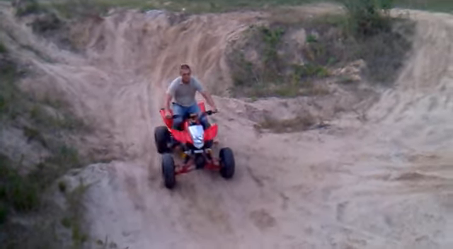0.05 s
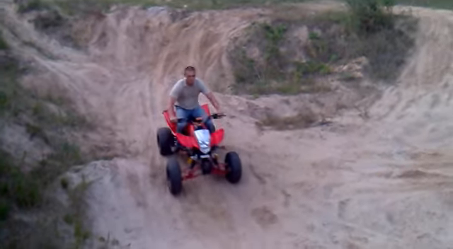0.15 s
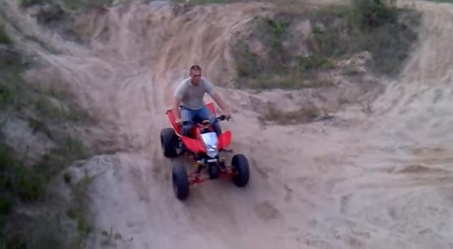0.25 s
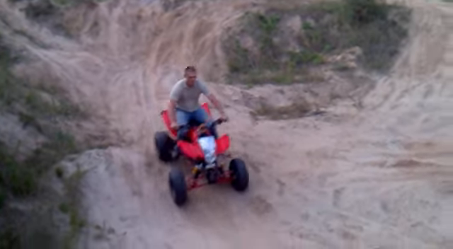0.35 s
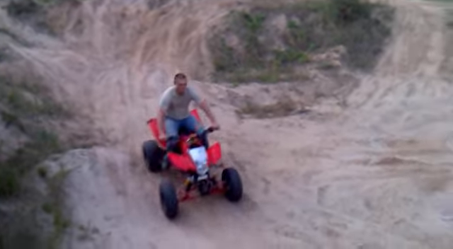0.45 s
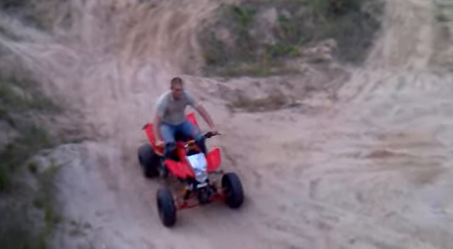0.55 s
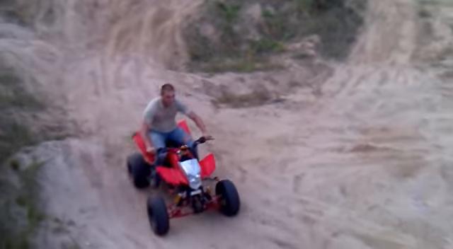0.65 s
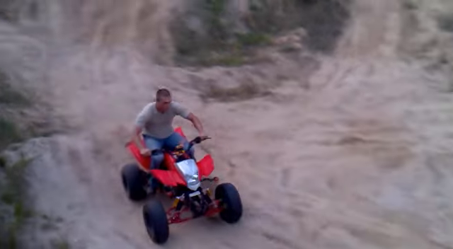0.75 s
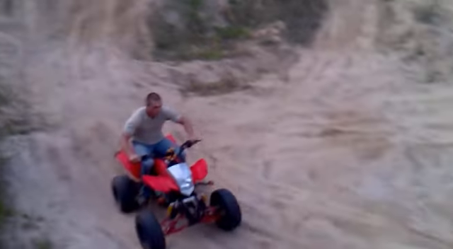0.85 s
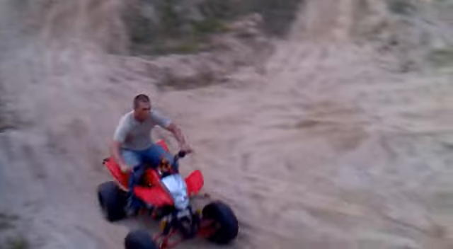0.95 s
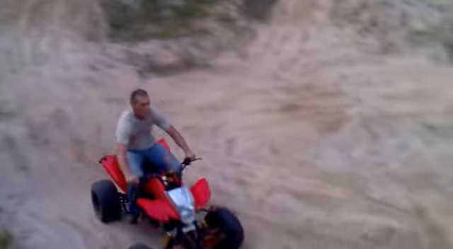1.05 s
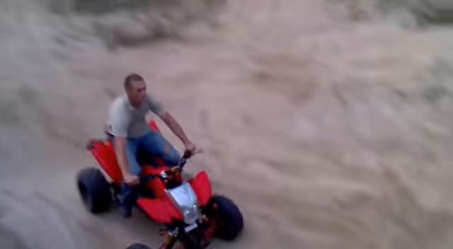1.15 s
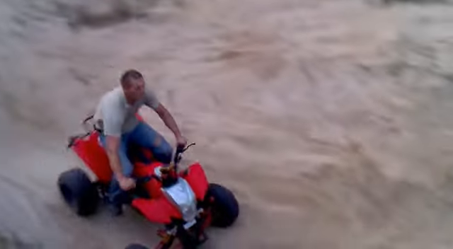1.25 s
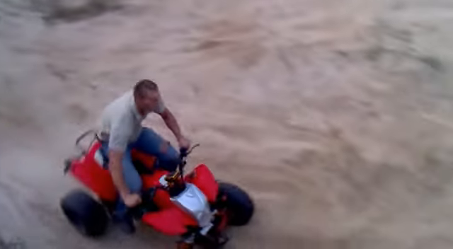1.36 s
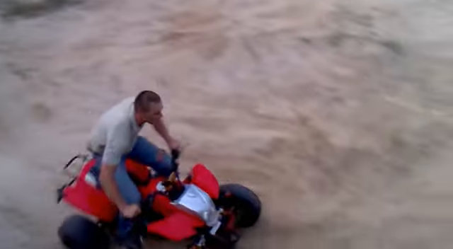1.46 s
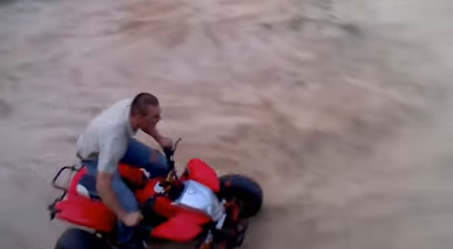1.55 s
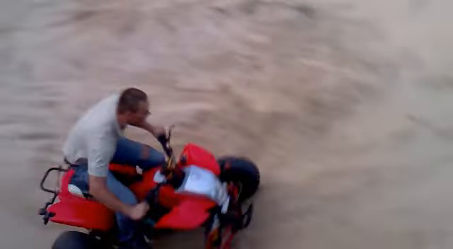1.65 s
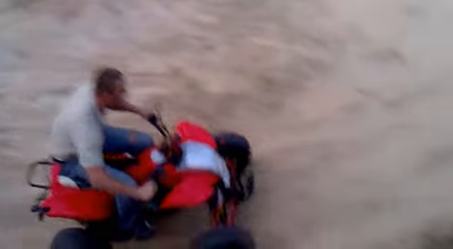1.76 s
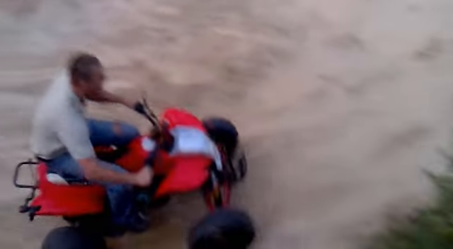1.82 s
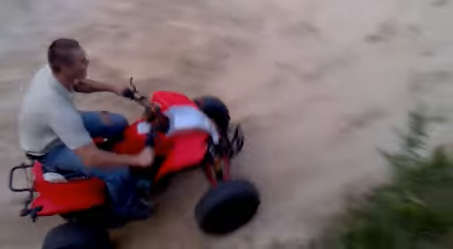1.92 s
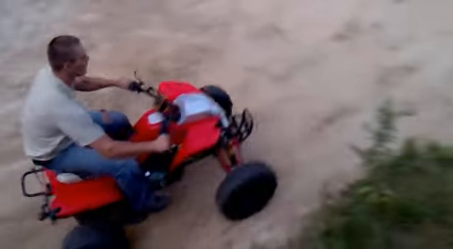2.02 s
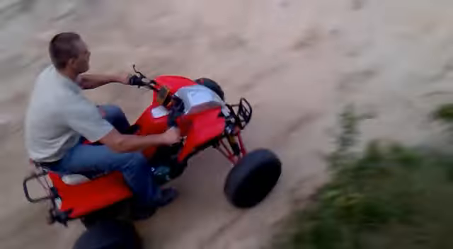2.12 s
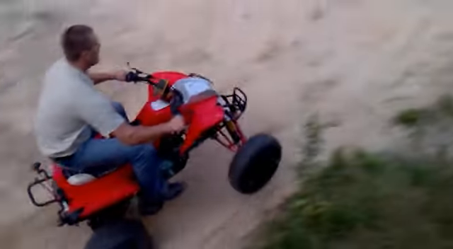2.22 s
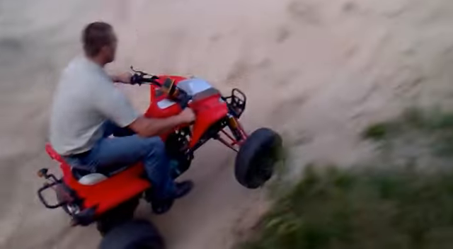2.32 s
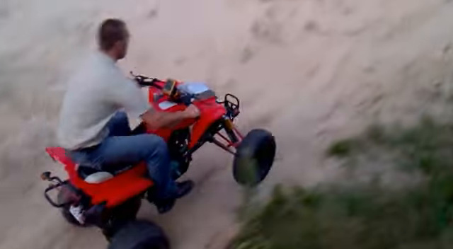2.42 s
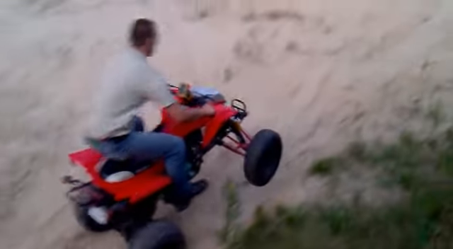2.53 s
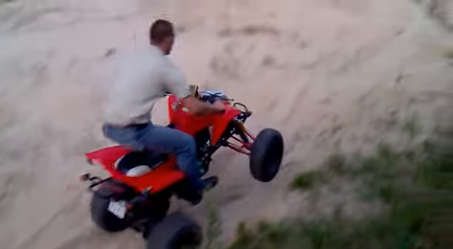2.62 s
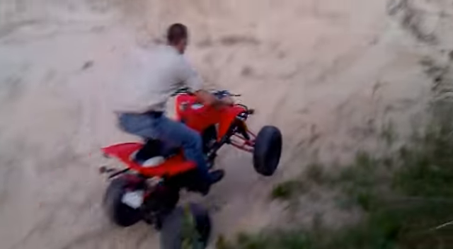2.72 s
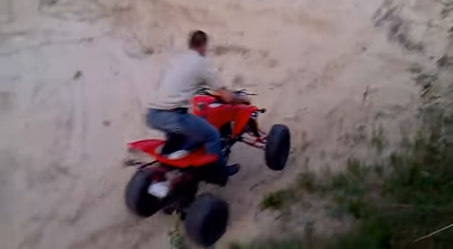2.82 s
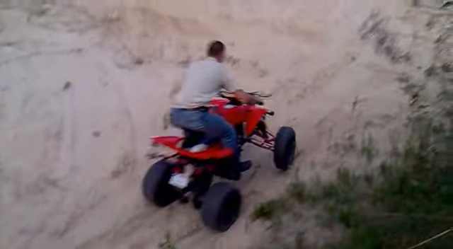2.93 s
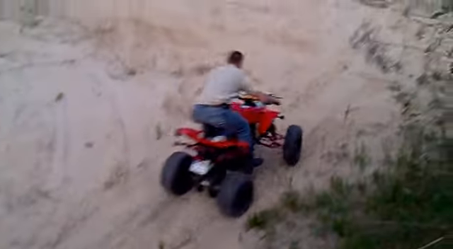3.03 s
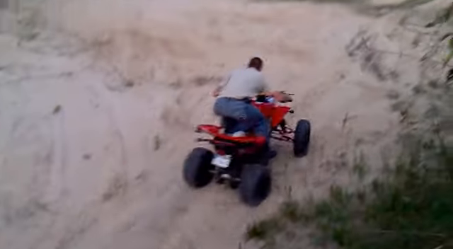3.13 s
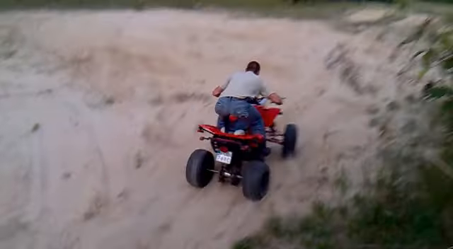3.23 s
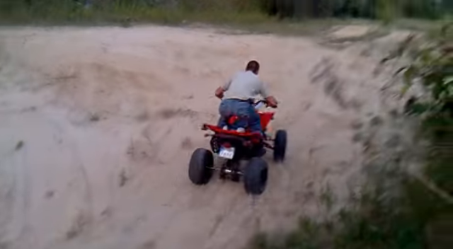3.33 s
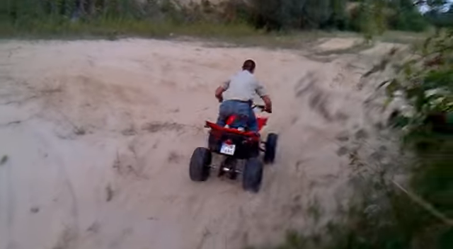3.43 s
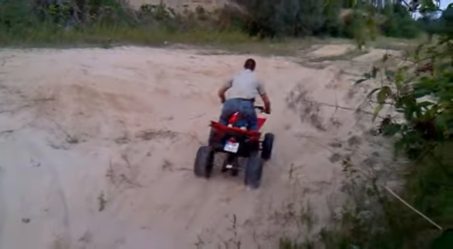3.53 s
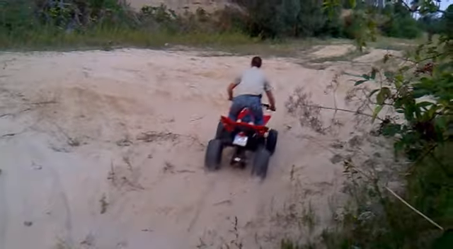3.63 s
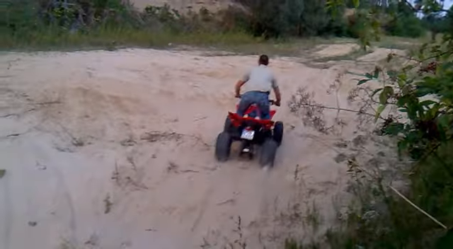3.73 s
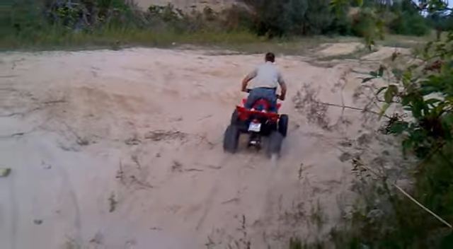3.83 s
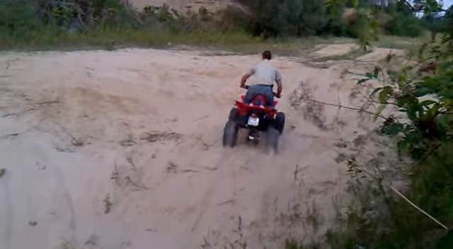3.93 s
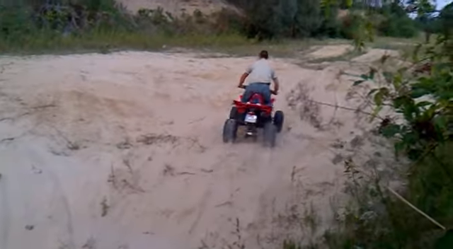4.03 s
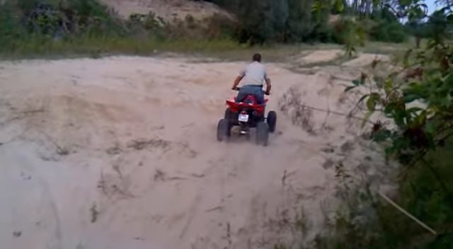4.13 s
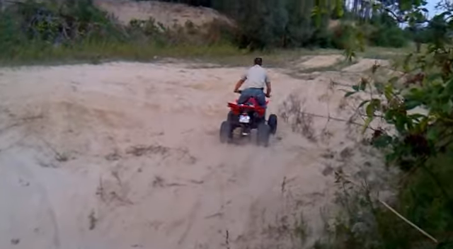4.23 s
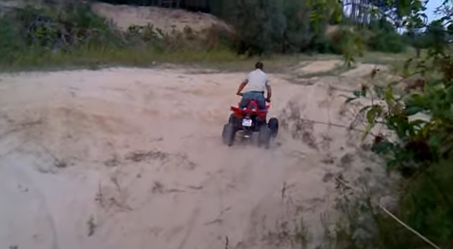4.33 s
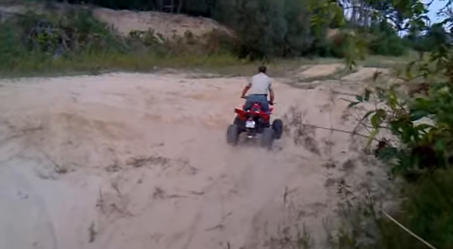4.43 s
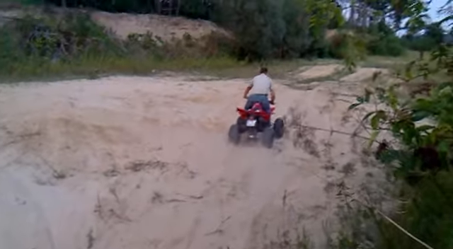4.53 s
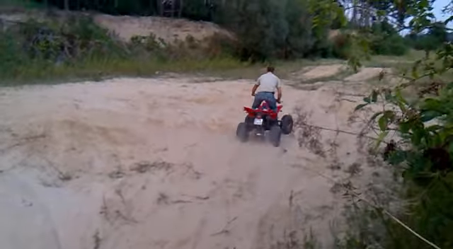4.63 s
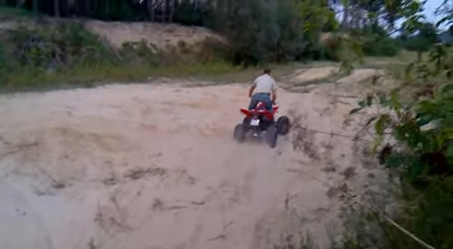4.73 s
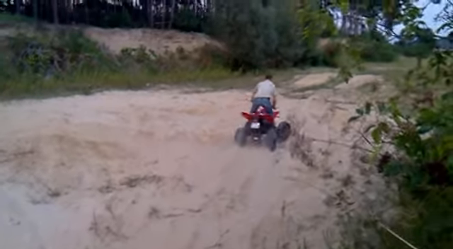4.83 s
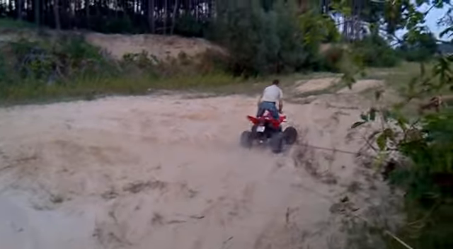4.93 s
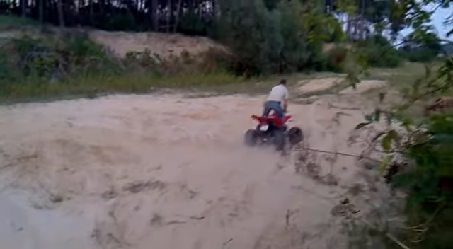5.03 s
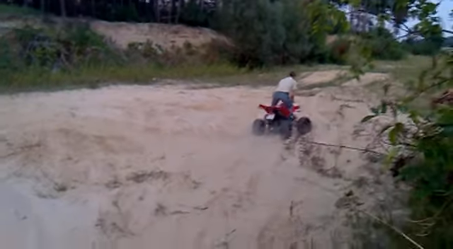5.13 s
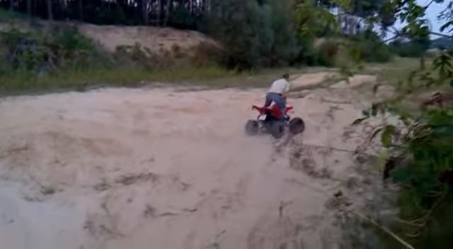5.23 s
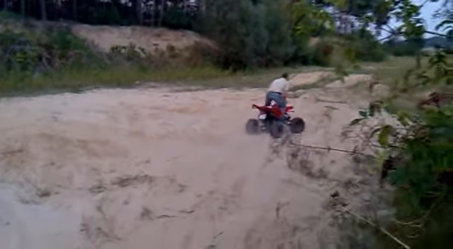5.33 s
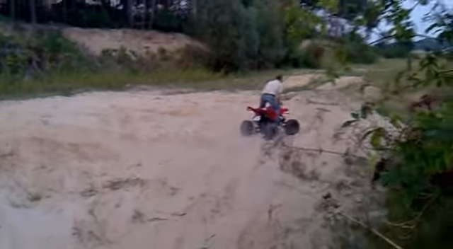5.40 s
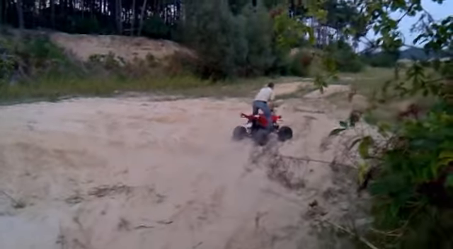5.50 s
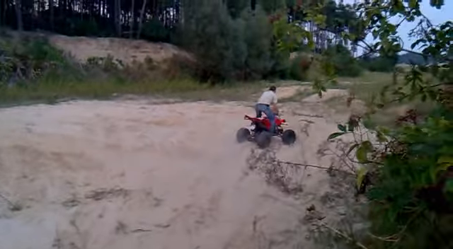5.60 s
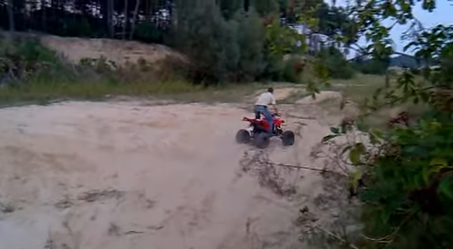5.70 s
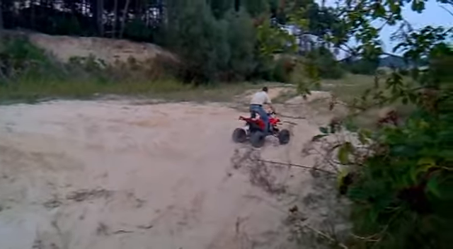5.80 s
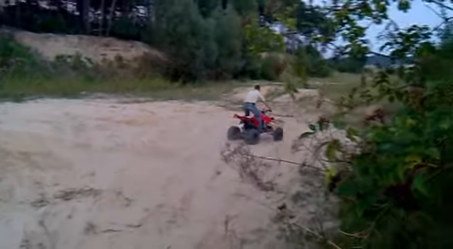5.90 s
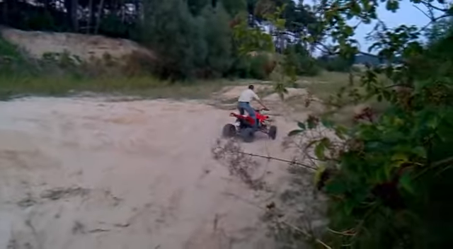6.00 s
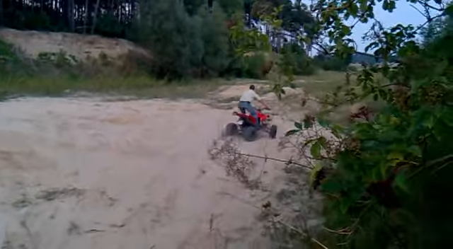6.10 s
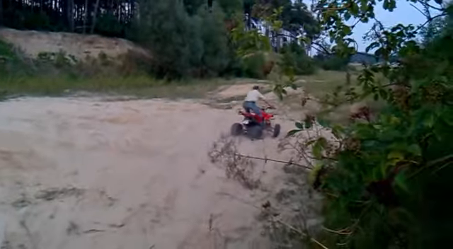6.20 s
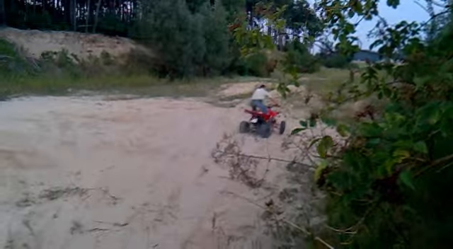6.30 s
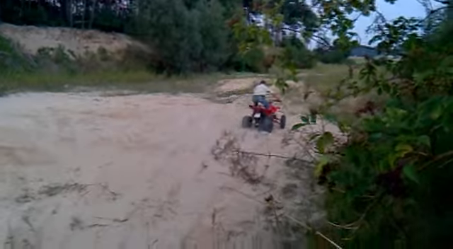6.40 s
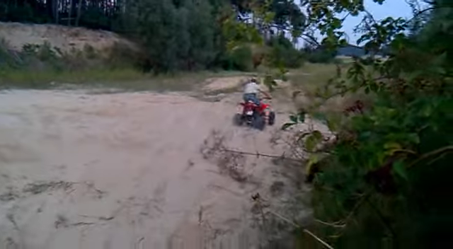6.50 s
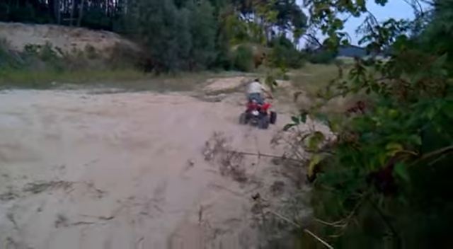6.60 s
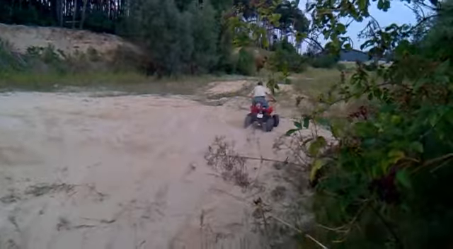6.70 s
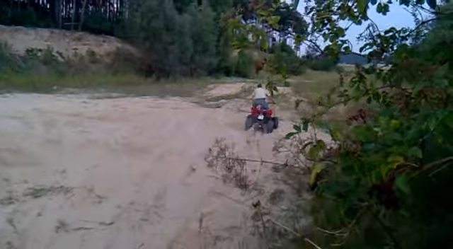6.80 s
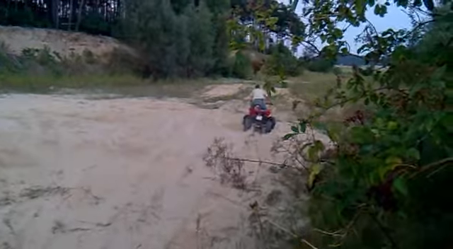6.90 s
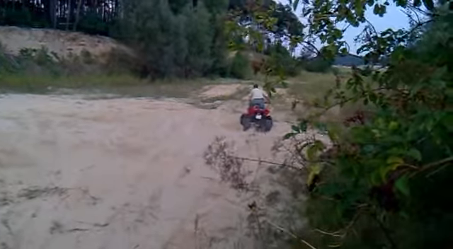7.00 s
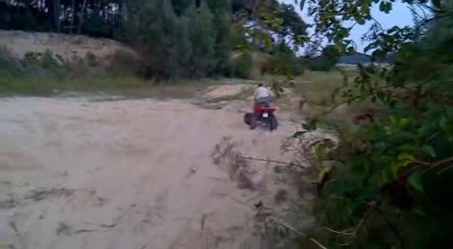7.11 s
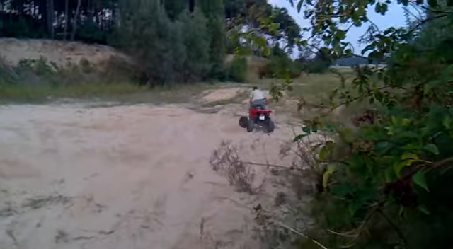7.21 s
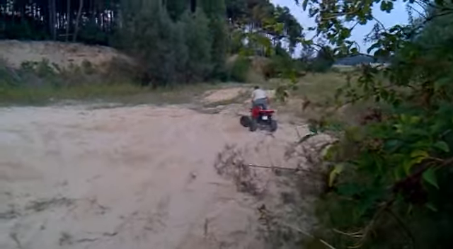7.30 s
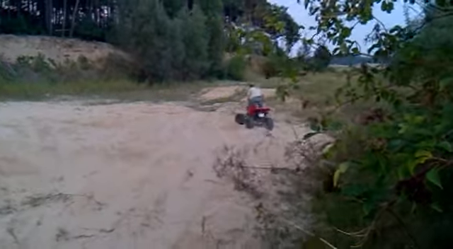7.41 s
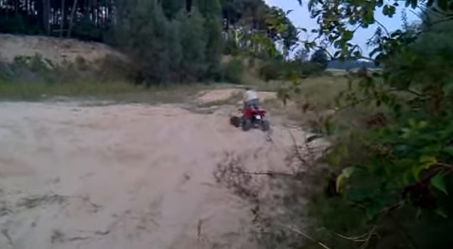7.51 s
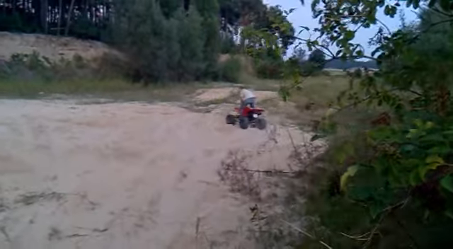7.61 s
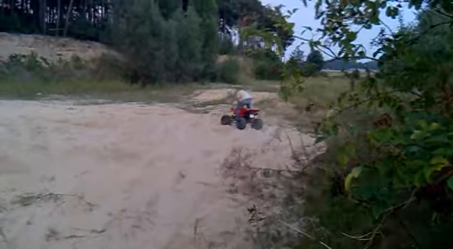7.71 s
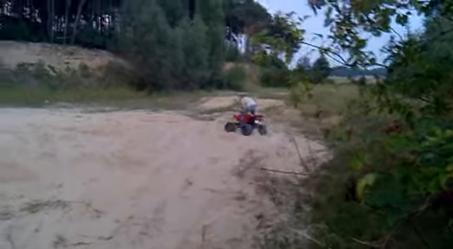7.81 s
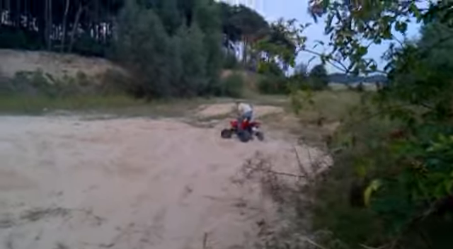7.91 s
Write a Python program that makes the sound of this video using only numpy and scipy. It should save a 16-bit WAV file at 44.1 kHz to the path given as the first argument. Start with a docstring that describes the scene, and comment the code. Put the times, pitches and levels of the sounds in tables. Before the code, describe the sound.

A mono, hand-held outdoor take in a sandy pit. From 0 s a single-cylinder quad bike approaches with a fast, muffled putter, about 32 firings a second, rising to 44 near 0.9 s, sagging around 1.3 s and picking up again. Casing rattle, dull sand churn and thin wavering gear whine ride along, with small chain slaps near 1.15 and 1.6 s. At 2 s it passes: the exhaust turns abruptly loud, raspy and bright, with gas hiss and rattle. Revs climb to about 57 a second around 3 s, with hard metallic cracks and slight overload. At 3.4 s the throttle shuts; pitch drops quickly to a hollow, uneven burble with soft pops around 3.9-4.2 s. A gentle throttle returns near 4.9 s, then the engine steadies and fades into the distance to 8 s. Low wind thuds buffet the microphone from 4.3 s, heaviest around 7.3 s, with faint leaf rustle.

```python
"""A single-cylinder quad bike rolls toward a hand-held microphone on sand, passes at open throttle, lifts off
and drives away. Each firing blows a thump and bark from harmonics, a crack of decaying pipe modes and a noise jet.
Shaped noise makes the rattle, churning tyres and chain slaps; unsteady sine tones make the gear whine.
Low noise gusts buffet the microphone, leaves stir nearby, and the input stage overloads softly."""
import sys
import numpy as np
from scipy.fft import rfft, irfft, next_fast_len
from scipy.io import wavfile
from scipy.ndimage import map_coordinates

SR = 44100
rng = np.random.default_rng(int(sys.argv[2]) if len(sys.argv) > 2 else 0)


def generate_wav(sig):
    """Save sig (samples, or channels by samples) to the path in sys.argv[1] as 16-bit PCM at SR."""
    pcm = np.round(np.clip(np.atleast_2d(sig).T, -1, 1) * 32767).astype(np.int16)
    wavfile.write(sys.argv[1], SR, pcm)


N = 350595


def amp(db):
    """Amplitude factor of a level in dB."""
    return 10 ** (np.asarray(db) / 20)


def unit(x):
    """x scaled to rms 1."""
    return x / np.sqrt(np.mean(x ** 2) + 1e-20)


def curves(rows, at):
    """Each column after the time, read at the given seconds."""
    seconds, *columns = np.transpose(rows)
    return [np.interp(at, seconds, column) for column in columns]


def wobble(rate):
    """A smooth random curve, rate knots a second."""
    knots = rng.standard_normal(int(N * rate / SR) + 4)
    return map_coordinates(knots, [np.arange(N) * rate / SR])


def filtered(x, response):
    """x times a response of frequency."""
    size = next_fast_len(N + SR // 2)
    spectrum = rfft(x, size) * response(np.fft.rfftfreq(size, 1 / SR))
    return irfft(spectrum, size)[..., :N]


def bands(rows):
    """Gain curve of humps and dips, each row (Hz, width Hz, dB)."""
    return lambda hz: amp(sum(db / (1 + (2 * (hz - centre) / width) ** 2) for centre, width, db in rows))


def hiss(spectrum):
    """Noise of rms 1 whose colour is drawn by (Hz, relative dB) points."""
    f, db = np.transpose(spectrum)
    colour = lambda hz: amp(np.interp(np.log(hz + 1), np.log(f), db))
    return unit(filtered(rng.standard_normal(N), colour))


def cased(spectrum):
    """Noise in the rings of fins and covers, whose pitch wanders as the machine turns."""
    # Rings of the casing and a gap between them. Each row: centre in Hz, width in Hz, gain in dB.
    casing_rings = [(2240, 1200, 6.5), (3965, 310, 3), (5310, 420, 4.5), (6420, 150, -8.5),
                    (7000, 580, 5.5)]
    drift = .025  # share of the pitch, per unit of the random curve
    read_at = np.cumsum(1 + drift * wobble(1.5))
    rung = filtered(hiss(spectrum), bands(casing_rings))
    return unit(map_coordinates(rung, [read_at], mode="mirror"))


def bounced(x, time):
    """x with an upside-down, duller echo off the sand, whose drifting delay combs it."""
    # Path of the echo. Each row: time in seconds, delay in ms.
    echo_path = [(0, 0.54), (1.05, 0.3), (1.2, 1.3), (2.4, 0.91), (2.9, 1.32), (4.2, 1.62), (5, 1.68)]
    echo_db, top_hz = -9.5, 2220
    delay_ms, = curves(echo_path, time)
    dull = filtered(x, lambda hz: 1 / (1 + (hz / top_hz) ** 4))
    return x - amp(echo_db) * np.interp(time - delay_ms / 1000, time, dull)


def bushes(wind_db):
    """Leaves stir nearby: bright noise that follows the wind at half its swing in dB."""
    return amp(.5 * wind_db - 36.5) * hiss([(500, -19), (2000, 3.5), (15000, -23.0)])


def gust_thuds(gust_rows):
    """The push that opens each gust: a low, quickly dying sine on the microphone."""
    # One row: pitch in Hz, decay time in seconds, level over the gust in dB.
    push = (59, .012, 2)
    hz, decay_s, over_db = push
    time, out = np.arange(N) / SR, 0
    for start, _, db in gust_rows:
        decay = np.exp(-np.abs(time - start) / decay_s)
        out = out + amp(db + over_db) * decay * np.sin(2 * np.pi * hz * np.maximum(time - start, 0))
    return out


def wind():
    """Lumpy low turbulence on the microphone; a stronger gust reaches higher."""
    # Gusts at the microphone. Each row: start in seconds, hold in seconds, level in dB.
    gust_rows = [(0.203, 0.14, -24.5), (1.537, 0.025, -15), (4.315, 0.24, -21), (4.696, 0.2, -19),
                 (5.049, 0.034, -10), (5.206, 0.16, -21), (5.878, 0.027, -14.5), (6.0, 0.024, -15),
                 (6.098, 0.14, -18.5), (6.333, 0.038, -16.5), (6.579, 0.15, -13.5), (6.983, 0.057, -17),
                 (7.147, 0.02, -17.5), (7.346, 0.087, -7), (7.472, 0.052, -9.5), (7.676, 0.0041, -14.5),
                 (7.792, 0.05, -10), (7.884, 0.012, -10.5)]
    # Breeze between gusts. Each row: time in seconds, level in dB.
    breeze_rows = [(0, -26), (1.4, -32.5), (2.0, -56), (4.1, -36), (4.25, -30), (5.35, -22), (5.5, -38),
                   (5.8, -34), (5.9, -23), (7.95, -30)]
    rise_db_per_s, fall_db_per_s = 700, 154
    time = np.arange(N) / SR
    levels = curves(breeze_rows, time)
    for start, hold, db in gust_rows:
        rise = rise_db_per_s * np.maximum(start - time, 0)
        fall = fall_db_per_s * np.maximum(time - start - hold, 0)
        levels.append(db - rise - fall)
    level_db = np.max(levels, axis=0)
    low = hiss([(12, -13), (28, 2.5), (70, -3.0), (150, -10.0), (300, -20.5), (700, -63), (2000, -100)])
    high = hiss([(60, 3.0), (150, -3.5), (300, -6.0), (700, -18.5), (3000, -55)])
    lumps = amp(3 * wobble(45))
    turbulence = amp(level_db) * unit(lumps * low)
    # the upper part swings twice as far in dB
    turbulence += amp(2 * (level_db + 10.5) - 25.0) * unit(lumps * high)
    return gust_thuds(gust_rows) + bushes(level_db) + turbulence


def chain_knocks():
    """Short bright chain slaps over bumps: decaying bursts of noise."""
    # Chain slaps. Each row: start in seconds, opening level in dB.
    slaps = [(1.1523, -30), (1.6185, -22), (4.174, -37), (6.0545, -36), (6.6165, -30.5)]
    envelope, t = np.zeros(N), np.arange(SR // 20) / SR
    for start, db in slaps:
        envelope[round(start * SR):][:len(t)] = amp(db - 60 * t / 0.12)  # falls 60 dB in 0.12 s, cut at 0.05 s
    return envelope * hiss([(1000, 2), (4000, 5.0), (8000, -0.5), (15000, -30)])


def gears(time, rate, turns):
    """An unsteady mesh tone that swells where it crosses a case resonance."""
    # Gear meshes. Each row: start in seconds, end in seconds, teeth per firing, case resonance in Hz,
    # resonance width in Hz, level in dB.
    meshes = [(.45, 1.4, 26.4, 1090, 130, -29), (1.07, 1.4, 41, 1620, 130, -31),
              (1.42, 2.0, 45, 1830, 330, -29), (2.3, 2.85, 39.5, 1820, 200, -26)]
    out = 0
    for start, end, teeth, hz, width_hz, db in meshes:
        fade = np.clip(np.minimum(time - start, end - time) / 0.016, 0, 1)
        level = fade * amp(db + 1.3 * wobble(44.67))
        tone = np.sin(2 * np.pi * (teeth * turns + width_hz / 1100 * wobble(500)))
        tone = tone * (1 + .3 * np.cos(2 * np.pi * turns))  # each firing loads the teeth
        out = out + level * tone / (1 + ((teeth * rate - hz) / width_hz) ** 2)
    return out


def churned_sand(rattle_db):
    """Tyres churning sand: dull uneven noise that fades slowly with distance."""
    # Colour of the churning. Each row: frequency in Hz, relative level in dB per Hz.
    sand_colour = [(560, -4), (850, -3.5), (1200, -6), (2500, -32.5)]
    return amp(0.65 * rattle_db - 18.5 + 2.5 * wobble(20)) * hiss(sand_colour)


def valve_rattle(rattle_db, phase):
    """Valve gear and chain: casing noise that swells once a firing, with a random flutter."""
    # Colour of the rattle ahead of the casing. Each row: frequency in Hz, relative level in dB per Hz.
    rattle_colour = [(470, -48), (800, -15), (952, -4.5), (1860, -4), (4060, -10), (5400, -12.5),
                     (15500, -40.5)]
    beat = 1 + .3 * np.cos(2 * np.pi * (phase - .15))
    return amp(rattle_db - 3.0) * unit(beat * amp(1.34 * wobble(40))) * cased(rattle_colour)


def gas_jet(rattle_db, cycle, since_firing, pipe_away):
    """Gas rushing out behind each pressure wave: noise puffs of uneven strength over a steady leak."""
    # Colour of the jet ahead of the casing. Each row: frequency in Hz, relative level in dB per Hz.
    jet_colour = [(1200, -2), (2310, -3.5), (3500, -14.5), (5000, -8), (6890, -9.5), (12700, -21),
                  (15500, -33)]
    behind_db = -8  # while the pipe points away
    late = np.maximum(since_firing - .0015, 0)  # the gas follows the pressure wave
    puff = np.exp(-late / 0.0023) * (1 - np.exp(-late / 0.00092)) + 0.16
    strength = amp(2.1 * rng.standard_normal(600)[cycle])
    # the jet grows faster than the rattle as the machine nears
    jet_db = 1.7 * (rattle_db + 24.5) + behind_db * pipe_away - 30.5
    return amp(jet_db) * unit(strength * puff) * cased(jet_colour)


def pipe_crack(thump_db, time, cycle, since_firing):
    """Each firing rings the hot tail pipe: decaying modes, lower in pitch when the gas is cooler."""
    # Tail pipe modes. Each row: frequency in Hz before the heat factor, relative level in dB,
    # time to fall 60 dB in seconds.
    pipe_modes = [(987, 12, 0.0059), (1177, 13, 0.005), (1800, -17, 0.019), (2407, -0.5, 0.016)]
    # Crack over the thump, strongest while the pipe points this way. Each row: time in seconds, level in dB.
    crack_over_thump = [(0, -17.5), (2.0, -26), (2.55, -22), (2.68, -7), (3.27, -9.5), (3.4, -31),
                        (3.47, -14.5), (3.95, -23.5), (4.75, -25.5), (4.9, -13), (6.1, -23.5),
                        (7.95, -23.5)]
    heat = np.interp(time, [2.7, 3.2, 3.9, 4.5], [0.86, 1.09, 0.79, 0.702])  # pitch factor
    ring = 0
    for hz, db, t60 in pipe_modes:
        decay = amp(db - 60 * since_firing / t60)
        ring = ring + decay * np.sin(2 * np.pi * hz * heat * since_firing)
    strength = amp(rng.standard_normal(600)[cycle])
    crack_db = thump_db + curves(crack_over_thump, time)[0]
    return -amp(crack_db) * unit(strength * ring)


def exhaust_note(orders, turns, direct=0.84, echo_turns=.56):
    """Thump (orders to 5) and bark (above) of one blow a turn, each rms 1, phased as a causal pulse."""
    k, db = np.transpose(orders)
    order = np.arange(33)
    gain = amp(np.interp(order, [0, *k, 32], [db[0] - 20, *db, db[-1] - 30]))
    # folding the cepstrum gives the minimum phase of this gain
    cepstrum = irfft(np.log(gain))
    cepstrum[1:32] *= 2
    cepstrum[33:] = 0
    lines = -np.exp(rfft(cepstrum)) * (order <= k[-1])
    # the bark bounces inside the silencer and comes out again later in the turn, without losing energy
    late = np.exp(-2j * np.pi * order * echo_turns)
    bounce = (direct + late) / (1 + direct * late)
    parts = (lines * (order <= 5), lines * bounce * (order > 5))
    shapes = [unit(irfft(part, 1024)) for part in parts]
    return np.array([np.interp(turns % 1, np.arange(1024) / 1024, shape, period=1) for shape in shapes])


def exhaust(throttle, thump_db, time, turns, facing_s):
    """One pressure blow per firing, its harmonics blended between throttle settings."""
    # Exhaust notes, shut, part and open throttle. Each row: multiple of the firing rate, relative level in dB.
    shut_orders = [(1, -31), (2, -4.5), (3, 5), (4, 1.5), (5, -13.5), (6, -35), (7, -28.5), (8, -25.5),
                   (9, -16.5), (10, -13.5), (11, -16)]
    part_orders = [(1, -16), (2, -2), (3, -4), (4, -7.5), (5, -4.5), (6, -6.5), (7, -15), (8, -22.5),
                   (9, -11.5), (10, -11.5), (11, -15.5), (12, -27.5)]
    open_orders = [(1, -2.5), (2, 6.5), (3, -2), (4, -12.5), (5, -15), (6, -4), (7, -6.5), (8, -6),
                   (9, -10.5), (10, -19.5), (11, -11.5), (12, -10.5), (13, -18.5), (14, -12), (15, -15.5),
                   (16, -16.5)]
    # Bark over the thump, fullest as the machine passes. Each row: time in seconds, level in dB.
    bark_over_thump = [(0, -9), (0.6, -3.5), (1.95, -1), (2.1, 0), (2.6, -3), (3.3, -9), (4.3, -20.5),
                       (5.1, -11.5), (5.9, -9), (6.5, -16.5), (7.95, -19.5)]
    # A fixed chamber that the bark passes. One row: centre in Hz, width in Hz, gain in dB.
    chamber = (370, 160, 4)
    # Colour of the exhaust heard from ahead. Each row: centre in Hz, width in Hz, gain in dB.
    front_colour = [(167, 47, 6.5), (234, 100, -6), (590, 330, -5)]
    away_lag_turns, lows_late_s, lows_hz = .06, .004, 150
    # while the pipe points away the blow comes late, and as a push, not a suck
    heard_turns = turns - away_lag_turns * (time < facing_s)
    polarity = np.tanh((time - facing_s) / .012)
    shares = [np.clip(1 - abs(throttle - setting), 0, 1) for setting in range(3)]
    settings = zip(shares, (shut_orders, part_orders, open_orders))
    thump, bark = sum(share * exhaust_note(orders, heard_turns) for share, orders in settings) * polarity
    bark = amp(-1.5) * filtered(bark, bands([chamber]))
    # with the throttle shut the charge burns unevenly
    blow = amp(thump_db + (0.5 + shares[0]) * wobble(35)) * thump
    bark_db = thump_db + curves(bark_over_thump, time)[0]
    blow = blow + amp(bark_db + wobble(60)) * bark

    def ahead(hz):
        """Round the machine the lowest notes arrive late, higher ones less so."""
        lag_turns = lows_late_s * lows_hz * (1 - np.exp(-hz / lows_hz))
        return bands(front_colour)(hz) * np.exp(-2j * np.pi * lag_turns)

    return np.where(polarity < 0, filtered(blow, ahead), blow)


def quad_bike():
    """One firing clock drives exhaust, crack, jet, rattle and gears; sand follows the rattle level."""
    # Engine pace. Each row: time in seconds, firings per second.
    pace = [(0.36, 31.73), (0.54, 35.1), (0.84, 43.39), (0.96, 44.27), (1.32, 36.34), (1.7, 42.29),
            (1.92, 39.23), (2.06, 39.03), (2.14, 42.21), (2.21, 39.02), (2.28, 40.93), (2.5, 41.9),
            (2.96, 56.7), (3.04, 56.62), (3.11, 56.97), (3.21, 54.41), (3.31, 57.72), (3.39, 53.6),
            (3.54, 44.09), (3.82, 37.33), (4.14, 41.7), (4.36, 35.8), (4.74, 33.37), (5.08, 39.08),
            (5.3, 38.56), (5.58, 40.31), (6.22, 37.13), (6.88, 37.05), (7.32, 35.57), (7.46, 37.65),
            (7.56, 36.14)]
    # The ride past. Each row: time in seconds, throttle (0 shut, 1 part, 2 open or beyond),
    # exhaust thump in dB, guide level in dB for rattle, jet and sand.
    ride = [(0.05, 1.12, -24.5, -34.5), (0.49, 0.78, -21.5, -32.5), (0.7, 1.6, -14.5, -28),
            (1.1, 1.24, -23, -29.5), (1.48, 1.4, -15, -27), (2.0, 1.58, -19.5, -28.5),
            (2.05, 2, -12.5, -20.5), (2.47, 1.85, -11.5, -19), (2.85, 1.96, -9, -20),
            (3.27, 2.1, -11, -22.5), (3.4, 7.5, -17.5, -28.5), (3.44, 0.23, -17, -28.5),
            (3.53, 0.24, -14, -30.5), (3.8, 0.25, -17, -35), (3.97, 0.5, -24, -37.5),
            (4.18, 0.43, -18.5, -35.5), (4.75, 1, -22, -42.5), (4.91, 0.95, -20, -35),
            (5.67, 1.1, -28.5, -39.5), (5.93, 0.99, -22.5, -34.5), (6.3, 1.06, -25, -43.5),
            (7.88, 0.89, -23.5, -45)]
    # Richer firings on the overrun. Each row: time in seconds, level over their neighbours in dB.
    rich_pops = [(3.858, 4.5), (4.012, 8), (4.18, 5)]
    facing_s = 2.018  # until then the pipe points away
    time = np.arange(N) / SR
    rate, = curves(pace, time)
    throttle, thump_db, rattle_db = curves(ride, time)
    throttle = np.clip(throttle, 0, 2)
    thump_db = thump_db + sum(db * np.exp(-((time - s) / 0.012) ** 2) for s, db in rich_pops)
    turns = np.cumsum(rate) / SR + .97 + .003 * wobble(30)  # firing cycles, slightly unsteady
    phase, cycle = turns % 1, np.floor(turns).astype(int)
    since_firing = phase / rate  # seconds
    blow = exhaust(throttle, thump_db, time, turns, facing_s)
    crack = pipe_crack(thump_db, time, cycle, since_firing)
    jet = gas_jet(rattle_db, cycle, since_firing, time < facing_s)
    noise = valve_rattle(rattle_db, phase) + jet + churned_sand(rattle_db)
    return blow + gears(time, rate, turns) + bounced(crack + noise, time)


def scene():
    """Wind at the microphone, chain slaps and the passing quad bike, in one channel."""
    return (wind() + chain_knocks() + quad_bike())[None]


def record(dry):
    """The input stage clips softly; the microphone hisses; nothing is kept above the band limit."""
    ceiling, top_hz = .72, 15800
    clipped = dry / (1 + np.abs(dry / ceiling) ** 10) ** (1 / 10)
    floor = amp(-61.5) * hiss([(300, 4), (8000, 12), (16000, -26)])
    return filtered(clipped + floor, lambda hz: hz < top_hz)


dry = scene()
out = record(dry)
generate_wav(out)
```